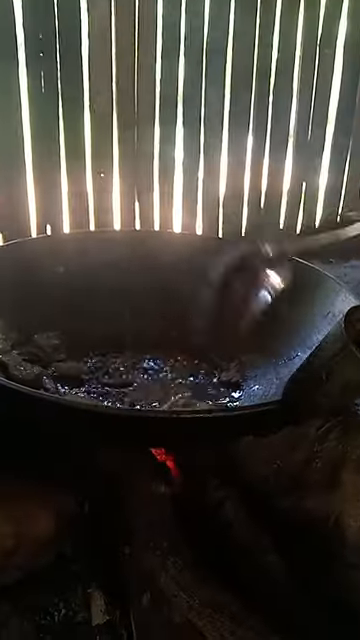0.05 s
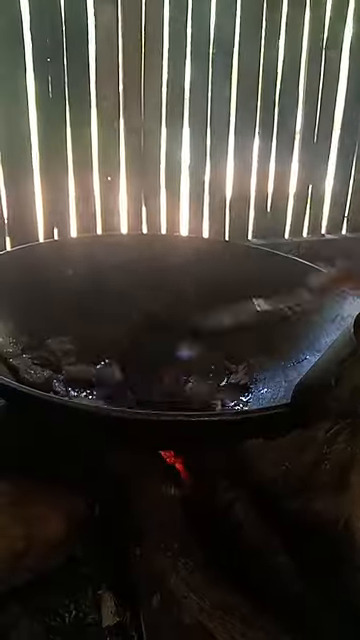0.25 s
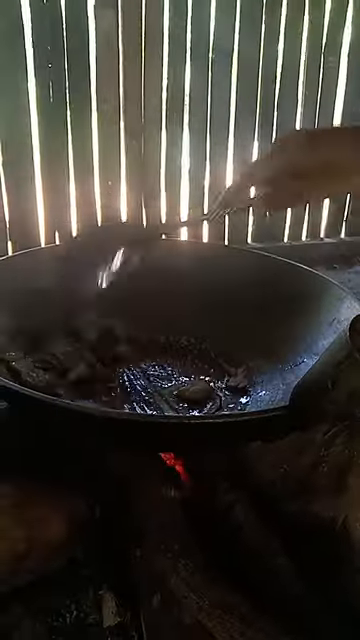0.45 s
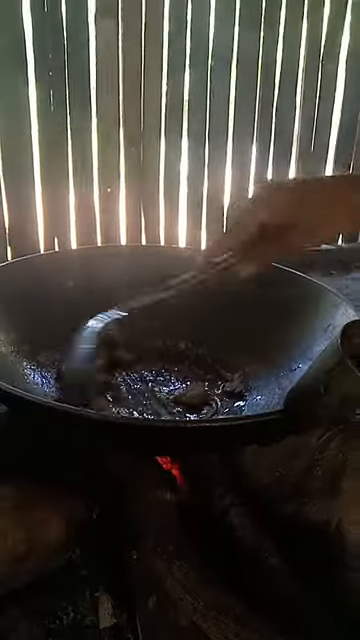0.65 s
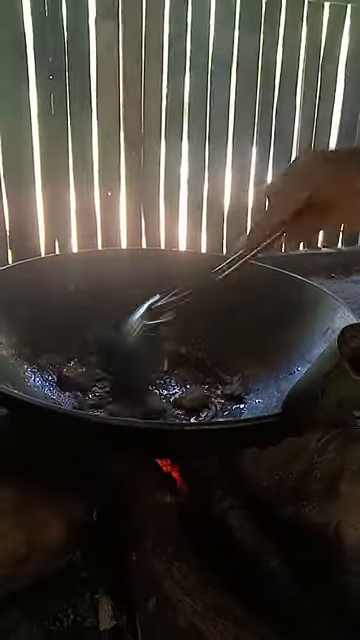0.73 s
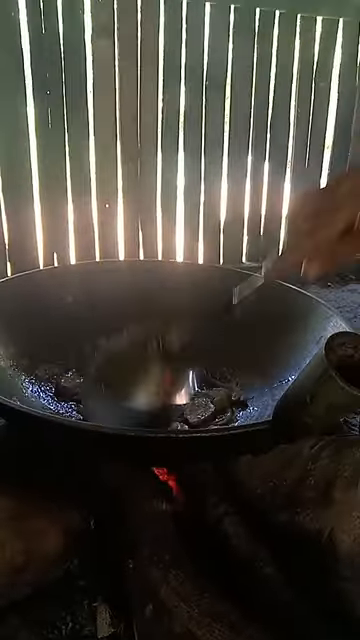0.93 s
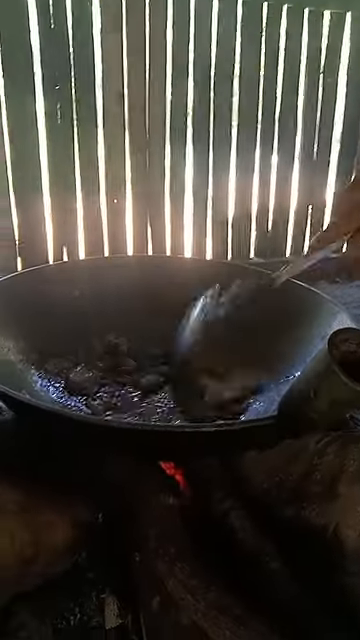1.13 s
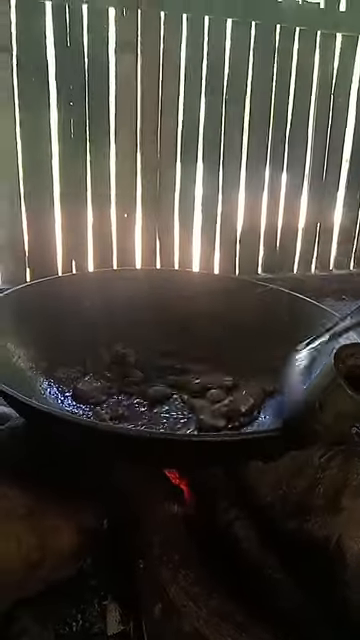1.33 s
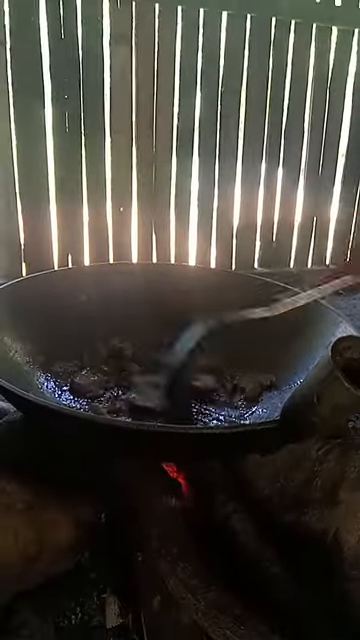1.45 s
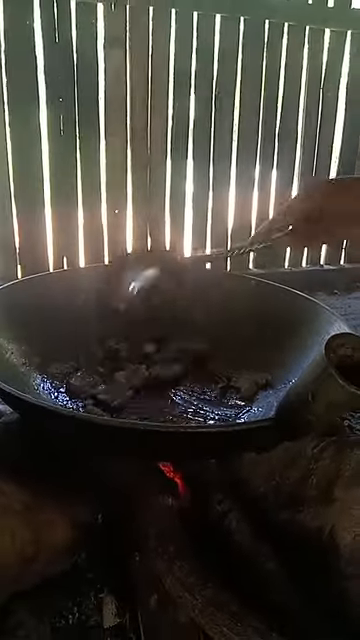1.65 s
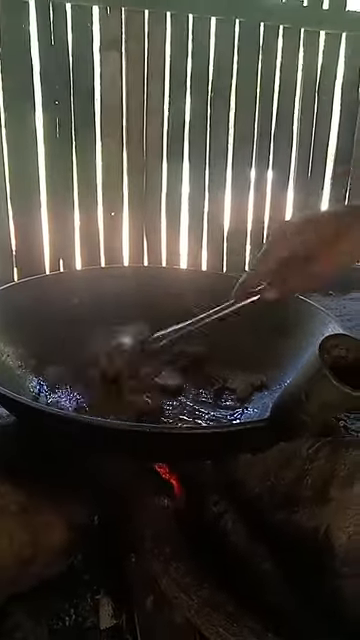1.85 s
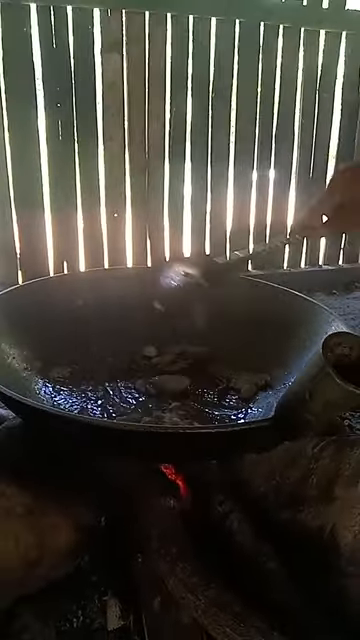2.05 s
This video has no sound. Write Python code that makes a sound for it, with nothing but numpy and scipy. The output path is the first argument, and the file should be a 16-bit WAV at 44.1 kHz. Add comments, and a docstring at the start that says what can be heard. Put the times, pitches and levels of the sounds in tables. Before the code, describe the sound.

A metal ladle strikes and scrapes a steel wok in four quick ringing strokes and a lighter last one, while oil sizzles and a wood fire flutters low, heard close in an open kitchen.

```python
"""Food sizzles in hot oil over the low flutter of a wood fire, close to a phone in an open kitchen.
Then a metal ladle lands on the steel wok, scrapes across it and squeals, and lumps of food thud.
Random clicks drive the wok's many short modes and the ladle's few; the squeals and the wok's long
low hum are wavering sines. Filtered noise makes the fire, and bursts over hiss make the sizzle.
The phone's limiter ducks everything around the hardest blows."""
import sys
import numpy as np
from scipy import signal
from scipy.fft import rfft, irfft
from scipy.io import wavfile
from scipy.ndimage import uniform_filter1d, map_coordinates

SR = 44100
rng = np.random.default_rng(int(sys.argv[2]) if len(sys.argv) > 2 else 0)


def master_out(mix):
    """Clip the mix to full scale and print it as 16-bit PCM to the path in sys.argv[1]."""
    frames = np.transpose(np.atleast_2d(mix))
    ceiling = np.clip(frames, -1, 1)
    pcm = np.round(ceiling * 32767).astype(np.int16)
    wavfile.write(sys.argv[1], SR, pcm)


N = 92610
T = np.arange(N) / SR  # time in seconds


def undb(db):
    """Turn dB into a gain."""
    return 10 ** (np.asarray(db) / 20)


def unit(x):
    """Scale to an rms of 1."""
    return x / np.sqrt(np.mean(x ** 2))


def shape(table, hz):
    """Gain at a pitch, read between the rows of a (Hz, dB) table."""
    table = np.array(table)
    return undb(np.interp(np.log(hz + 1), np.log(table[:, 0]), table[:, 1]))


def curve(table, col=1, outside=-120):
    table = np.array(table)
    return undb(np.interp(T, table[:, 0], table[:, col], left=outside, right=outside))


def mode(x, hz, width):
    """One resonance: a narrower width in Hz rings longer; white noise peaks equally high at any width."""
    r = np.exp(-np.pi * width / SR)
    return signal.lfilter([1 - r, 0, r - 1], [1, -2 * r * np.cos(2 * np.pi * hz / SR), r * r], x)


def modes_norm(modes):
    """Joint size of a set of modes, used to bring the set to a common level."""
    return np.sqrt(sum(undb(2 * db) * width * np.pi / SR for hz, width, db in modes))


def walk(rate):
    """Smooth random wandering with an rms of 1, drawing about `rate` new values per second."""
    k = int(SR / rate)
    steps = np.repeat(rng.standard_normal(N // k + 1), k)
    smooth = uniform_filter1d(uniform_filter1d(steps, k), k)
    return unit(smooth[:N])


def clicks(rate, spread_db):
    """Random clicks of either sign, `rate` per second, a few much larger than the rest."""
    chance, side, size = rng.random((3, N))
    happens = chance < rate / SR
    return unit(happens * np.sign(side - .5) * undb(-spread_db * np.log(size + 3e-3)))


# Tone colour of the sizzle. Each row: pitch in Hz, relative strength in dB per Hz.
FIZZ = [(410, -61), (700, -22.5), (908, -23), (1160, -18.5), (1600, -15), (2030, -20), (2500, -26),
        (3500, -18), (4530, -10.5), (4860, -6), (6310, 2), (7350, -14.5), (7900, -19.5), (8600, -25),
        (9500, -24), (10600, -36), (12000, -55)]
# Loudness of the sizzle before its random flutter. Each row: time in seconds, level in dB.
FIZZ_LEVEL = [(0, -34), (.04, -31.5), (.1, -34.5), (.12, -26.5), (.19, -33), (.4, -33.5), (.47, -32.5),
              (.49, -25), (.55, -25), (.57, -27), (.74, -31.5), (.78, -29.5), (.84, -31), (.95, -30),
              (1.02, -33.5), (1.25, -36.5), (1.3, -28.5), (1.36, -36.5), (1.6, -32), (1.72, -33.5),
              (1.88, -35), (1.92, -31.5), (1.96, -41.5), (1.99, -34.5), (2.1, -38.5)]
POP_RATE, POP_DB = 1500, 4  # bursts per second in a band at 6000 Hz, spread of their size in dB
HISS_DB, FLICKER_DB = 0.5, 3.5  # hiss against bursts, flicker of each band
STEAM_DB = -56.5  # even, broad hiss


def sizzle():
    """Bubbles of every size burst over a flickering hiss; higher bands have more bursts."""
    bubbles = 0
    for hz in 750 * 2 ** np.arange(0, 4.1, .2):  # five bands per octave
        bursts = clicks(POP_RATE * hz / 6000, POP_DB)
        push = bursts + undb(HISS_DB) * rng.standard_normal(N)
        band = mode(mode(mode(push, hz, hz / 5), hz, hz / 5), hz, hz / 4)
        bubbles = bubbles + shape(FIZZ, hz) * undb(FLICKER_DB * walk(20)) * band
    steam = unit(mode(mode(rng.standard_normal(N), 1200, 2300), 2800, 8600))
    flutter = undb(1.9 * walk(30.11))
    return undb(STEAM_DB) * steam + unit(bubbles) * curve(FIZZ_LEVEL, outside=None) * flutter


# Tone colour of fire and surroundings. Each row: pitch in Hz, relative strength in dB per Hz.
FIRE = [(15, -65), (25, -35), (76, 0.5), (144, 0.5), (237, -3.5), (267, -7.5), (502, -13), (557, -10.5),
        (900, -25), (1170, -53), (1980, -120)]
# Their rise and fall, before a 2 dB lift and random flutter. Each row: time in seconds, level in dB.
FIRE_LEVEL = [(0.0, -55), (0.06, -54), (0.1, -58.5), (0.19, -55.5), (0.23, -66), (0.33, -49.5), (0.4, -59),
              (0.47, -57), (0.61, -56), (0.68, -51), (0.72, -58), (1.15, -52.5), (1.23, -51.5), (1.34, -55),
              (1.4, -68), (1.51, -51), (2.05, -59), (2.1, -53.5)]


def fire():
    """Low flutter of the fire: noise below 900 Hz whose loudness wanders."""
    f = np.arange(N // 2 + 1) * SR / N
    rumble = unit(irfft(rfft(rng.standard_normal(N)) * shape(FIRE, f) * (f < 900), N))
    return curve(FIRE_LEVEL, outside=None) * undb(2 + 3.45 * walk(14.08)) * rumble


# Swells of the wok's hum. Each row: time in seconds, rms level in dB.
HUM = [(0.0, -86), (0.06, -69), (0.21, -86), (0.32, -43.5), (0.47, -66), (0.54, -52), (1.0, -59.5),
       (1.02, -48), (1.26, -50), (1.3, -63), (1.67, -44), (1.74, -58), (2.08, -66.5), (2.1, -81)]
HUM_HZ = 233.5


def wok_hum():
    """The wok's long low hum: one sine that wavers slightly."""
    tone = np.sin(2 * np.pi * HUM_HZ * T + .8 * walk(20))
    return np.sqrt(2) * curve(HUM, outside=None) * tone


# Swells of one mode that rings on after a stroke. Each row: time in seconds, rms level in dB.
RING = [(1.1, -33), (1.36, -66), (1.384, -59), (1.488, -27.5), (1.592, -42.5), (1.65, -54), (1.686, -53),
        (1.728, -75), (1.772, -41), (1.8, -45)]
RING_HZ = 1190


def lasting_ring():
    """One wok mode rings on: a slightly wavering sine."""
    return np.sqrt(2) * curve(RING) * np.sin(2 * np.pi * RING_HZ * T + 0.69 * walk(6.7))


# Colour of the wok's many small, crowded modes. Each row: pitch in Hz, relative strength in dB per Hz.
DENSE = [(150, -37), (318, -20), (368, -1), (627, -7.5), (1000, -7.5), (1430, -10.5), (1570, -0.5),
         (2980, -21.5), (3320, -10.5), (3780, -8), (4800, -6), (5980, -2.5), (6900, -6), (8000, -19),
         (9500, -24), (11000, -62), (12500, -70)]
DENSE_T60_S = 0.066  # time for their noise to fade by 60 dB


def dense_modes():
    """Crowded small modes merge into a short, coloured, fading noise."""
    fading = rng.standard_normal(8192) * 1e-3 ** (T[:8192] / DENSE_T60_S)
    f = np.arange(4097) * SR / 8192
    return irfft(rfft(fading) * shape(DENSE, f))[:4096]


# The wok's clear modes, in four groups from bass to treble.
# Each row: pitch in Hz, width in Hz, relative strength in dB.
WOK = [
    [(374.3, 35, 0.5), (486, 53, 0.5), (542, 74, -3.5), (646, 77, -12.5), (790, 42, -11.5), (911, 81, -5),
     (1002, 17, -3)],
    [(1182, 5.7, -9), (1300, 29, -13.5), (1514, 50, 1), (1876, 140, -2.5), (2347, 46, -7)],
    [(2741, 49, -2), (3026, 23, -37), (3283, 36, -1), (3375, 75, -1.5)],
    [(4202, 47, 8), (4806, 144, 5), (4928, 47, 12), (5210, 86, 8.5), (5570, 23, -21), (6022, 83, 10.5),
     (6496, 204, 5.5), (7200, 96, -9), (7100, 80, -39), (8400, 50, -40), (8450, 27, -48), (8830, 23, -55),
     (8460, 89, -40), (9700, 46, -34), (10400, 71, -10), (10750, 160, -11), (12400, 120, -61)],
]
# Borders of those four groups: a plain list of pitches in Hz.
EDGES_HZ = [280, 1050, 2450, 3900, 12500]
# Blows of ladle and food. Each row: start in seconds, force in dB in the four groups, decay in seconds.
BLOWS = [(0.2056, -26.5, -15.5, -22.5, 3.5, 0.0073), (0.3196, -12.5, -20, -40, -25, 0.0037),
         (0.356, -12, -24.5, -46, -49, 0.0038), (.572, -11, -18.5, -27, -7.5, 0.006),
         (0.59, -14.5, -28, -40, -26, 0.0033), (0.6579, -20, -34, -34, -26, 0.0051),
         (1.027, -16, -9.5, -38, -5.5, .007), (1.126, -26, -26, -22, -16, 0.0026),
         (1.196, -11, -19, -30, -45, 0.0019), (1.3921, -13, 0.5, -4.5, 10.5, 0.0065),
         (1.548, -46, -58, -31, -22, 0.0027)]
# Scraping strokes of the ladle, one list per stroke.
# Each row: time in seconds, force in dB in the four groups.
STROKES = [
    [(0.225, -27.5, -23.5, -26, -23), (0.261, -33, -30, -36, -29), (0.301, -33.5, -27.5, -27.5, -14.5),
     (0.327, -30, -26, -33, -21), (0.347, -28.5, -36, -39, -35), (0.357, -23, -28.5, -44, -38),
     (0.367, -30, -34, -55, -43), (0.375, -25.5, -38, -48, -36), (0.385, -33, -45, -59, -45),
     (0.397, -32.5, -54, -57, -34), (0.427, -41, -58, -60, -38), (0.44, -51, -50, -41, -32)],
    [(0.585, -24, -29, -24, -15.5), (0.607, -28.5, -33, -37, -21.5), (0.631, -35.5, -40, -37, -17.5),
     (0.643, -38, -40, -39, -16), (0.661, -19.5, -34.5, -31, -21.5), (0.679, -26.5, -44, -33, -23.5),
     (0.695, -25, -29, -38, -21.5), (0.721, -40, -43, -41, -27.5), (0.737, -52, -64, -45, -47)],
    [(1.045, -27.5, -27, -44, -26.5), (1.075, -25, -30, -57, -29.5), (1.089, -20, -24.5, -61, -28.5),
     (1.097, -26.5, -16.5, -19.5, -15), (1.115, -25.5, -18.5, -17.5, -14), (1.163, -31, -28.5, -33, -21.5),
     (1.187, -33, -29, -43.5, -45), (1.197, -36, -38, -49, -38), (1.203, -33.5, -39, -49, -46),
     (1.209, -42, -38, -45, -33), (1.237, -51.5, -53, -56, -37), (1.27, -41, -46, -51, -39)],
    [(1.415, -23.5, -21.5, -25, -16), (1.443, -28.5, -22.5, -28, -24.5), (1.459, -30, -20.5, -33, -22),
     (1.483, -24.5, -23.5, -26, -22), (1.501, -30.5, -25.5, -35, -23), (1.515, -30.5, -26, -35, -23),
     (1.537, -49, -38, -50, -40), (1.551, -52, -47, -42, -33), (1.56, -57, -42, -49, -39)],
]
BLOW_RATE = 4900  # contacts per second while a blow rattles
GRIT_RATE, GRIT_DB = 5000, 3  # slips per second, spread of their size in dB
CONTACT_DB = 5  # most that a mode rises or falls as the contact moves
MODES_DB, DENSE_DB = -3, -5  # share of the clear modes and of the crowded ones
SNAP_DB = -7.5  # the dry crack of a contact, before anything rings
WOK_TOP_HZ = 8900  # the wok's sound thins out above this


def wok():
    """Blows and slips drive the wok; each group of modes takes its own force."""
    rattle = clicks(BLOW_RATE, 1.5)
    dense = dense_modes()
    out = lasting_ring()
    for b, modes in enumerate(WOK):
        slide = sum(curve(stroke, b + 1) for stroke in STROKES)
        blows = 0
        for row in BLOWS:
            start, decay = row[0], row[-1]
            blows = blows + undb(row[b + 1]) * (T >= start) * np.exp(-np.abs(T - start) / decay)
        hits = blows * rattle
        force = slide * clicks(GRIT_RATE, GRIT_DB) + hits
        band = signal.butter(4, EDGES_HZ[b:b + 2], "band", fs=SR, output="sos")
        if b < 3:  # no dry crack in the top group
            snap = signal.sosfilt(band, hits) / signal.sosfilt(band, rattle).std()
            out = out + undb(SNAP_DB) * snap
        norm = modes_norm(modes)
        for hz, width, db in modes:
            contact = undb(CONTACT_DB * np.tanh(walk(14)))
            ring = mode(force * contact, hz, width)
            # the second, wider resonance trims what lies far from the pitch
            out = out + undb(db + MODES_DB) / norm * mode(ring, hz, hz / 8)
        body = signal.sosfilt(band, dense)
        body = body / np.sqrt(np.sum(body ** 2))
        out = out + undb(DENSE_DB) * signal.fftconvolve(force, body)[:N]
    return signal.sosfilt(signal.butter(3, WOK_TOP_HZ, fs=SR, output="sos"), out)


# Squeals of the ladle edge. Each row: loudest moment in seconds, pitch in Hz at that moment,
# peak level in dB before wavering, half length in seconds, glide in Hz per second.
SQUEALS = [(0.31, 6800, -22, .015, 0), (0.592, 4940, -20.5, 0.025, 0), (.633, 5995, -7, 0.011, 0),
           (0.634, 4800, -21.5, 0.02, -1500), (0.76, 4800, -32, 0.0093, 3), (1.117, 4725, -13, 0.013, 0),
           (1.508, 5960, -20, .015, 0), (1.811, 4320, -21, 0.011, 0), (1.837, 2920, -36, 0.012, 0)]
SQUEAL_ROUGH = 0.13  # rms wavering of loudness, as a share; phase wavers by three times this in radians


def squeals():
    """Short wavering tones that swell and die."""
    out = 0
    for s, hz, db, length, glide in SQUEALS:
        t = T - s
        tone = np.sin(2 * np.pi * (hz + glide * t / 2) * t + SQUEAL_ROUGH * 3 * walk(120))
        swell = np.exp(-(t / length) ** 2)
        out = out + undb(db) * swell * (1 + SQUEAL_ROUGH * walk(200)) * tone
    return out


# The ladle's own modes. Each row: pitch in Hz, width in Hz, relative strength in dB.
LADLE = [(500, 48, -19), (703, 98, -23.5), (1083, 86, -12.5), (1620, 130, -12), (2396, 140, -13.5),
         (2860, 43, -17), (3670, 120, -10.5), (4140, 110, -5.5), (4920, 90, -7), (5290, 42, -6),
         (5770, 160, -4), (5990, 90, -2), (6680, 87, -4.5), (7540, 110, -11.5)]
# The last, light stroke, which rings them. Each row: time in seconds, force in dB.
LIGHT_STROKE = [(1.7595, -17.5), (1.763, -12), (1.772, -18), (1.81, -20.5), (1.84, -25.5), (1.852, -32),
                (1.87, -40)]
LADLE_RISE = .3  # share of pitch gained per second


def ladle():
    """Slips ring the ladle's few modes; their steady rise in pitch stands for it pressing harder."""
    force = curve(LIGHT_STROKE) * clicks(GRIT_RATE / 2, GRIT_DB)
    out = 0
    for hz, width, db in LADLE:
        contact = undb(5.4 * np.tanh(walk(24.91)))
        out = out + undb(db) * mode(mode(force * contact, hz, width), hz, hz / 10)
    late = np.maximum(T - LIGHT_STROKE[0][0], 0)
    # reading the sound ever faster raises its pitch
    position = (T + LADLE_RISE * late ** 2 / 2) * SR
    return map_coordinates(out / modes_norm(LADLE), [position], mode="nearest")


ROOM_DECAY_S, ROOM_DB = 0.11, -15  # time for the echo to fade by 64 dB, its share


def kitchen_echo(metal):
    """The kitchen answers the metal with a short tail of fading noise."""
    tail = rng.standard_normal(SR // 4) * 0.00064 ** (T[:SR // 4] / ROOM_DECAY_S)
    tail = tail / np.sqrt(np.sum(tail ** 2))
    return undb(ROOM_DB) * signal.fftconvolve(metal, tail)[:N]


def scene():
    """Sizzle, fire and hum, with the metal and its echo."""
    metal = wok() + squeals() + ladle()
    return (sizzle() + fire() + wok_hum() + metal + kitchen_echo(metal))[None]


CEILING, RELEASE_S = 0.94, 0.04  # peak level that starts the ducking, time constant of recovery
BLOCK_S, BLOCK_START_S = .02, .0135  # length of a gain block, start of the first full one
TOP_HZ = 11700  # everything above is cut


def record(dry):
    """A limiter sets its gain by blocks, so it ducks before a blow and recovers after; the top is cut."""
    size, lead = int(BLOCK_S * SR), int((BLOCK_S - BLOCK_START_S) * SR)
    padded = np.pad(dry[0], (lead, size - (N + lead) % size))
    blocks = np.abs(padded).reshape(-1, size)
    cut_db = np.maximum(20 * np.log10(blocks.max(axis=1) / CEILING), 0)
    for k in range(1, len(cut_db)):
        cut_db[k] = max(cut_db[k], cut_db[k - 1] * np.exp(-BLOCK_S / RELEASE_S))
    steps = undb(-np.repeat(cut_db, size)[lead:lead + N])
    gain = uniform_filter1d(steps, size=45)  # about 1 ms, to soften the steps
    return signal.sosfilt(signal.ellip(8, .2, 50, TOP_HZ, fs=SR, output="sos"), dry * gain)


dry = scene()
out = record(dry)
master_out(out)
```